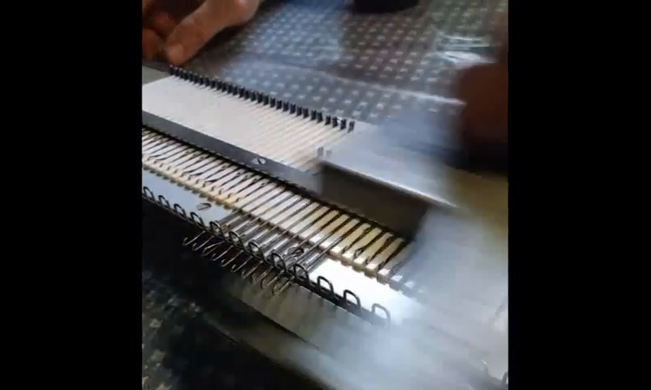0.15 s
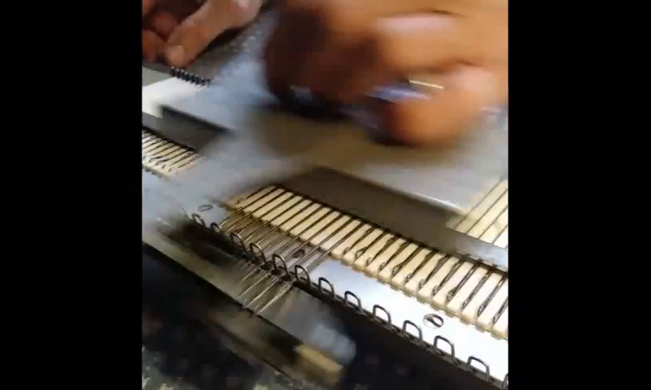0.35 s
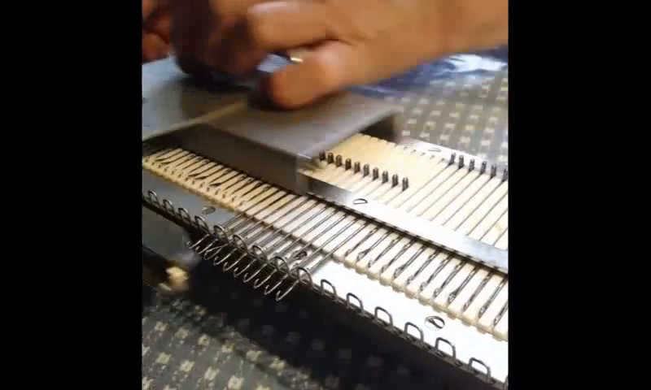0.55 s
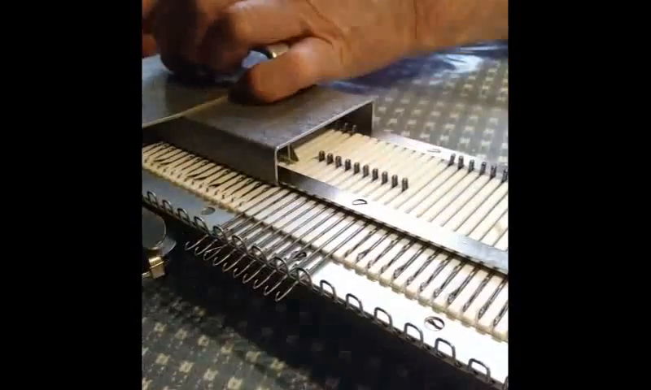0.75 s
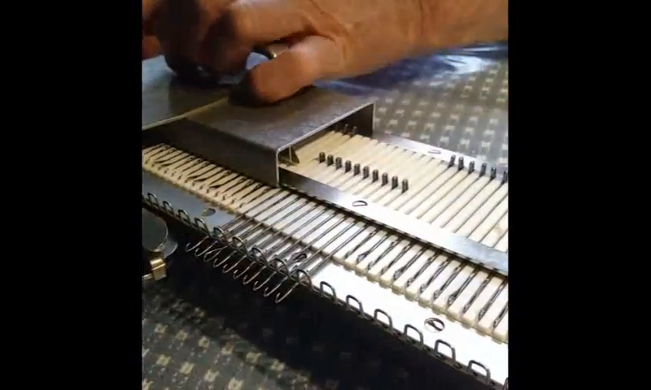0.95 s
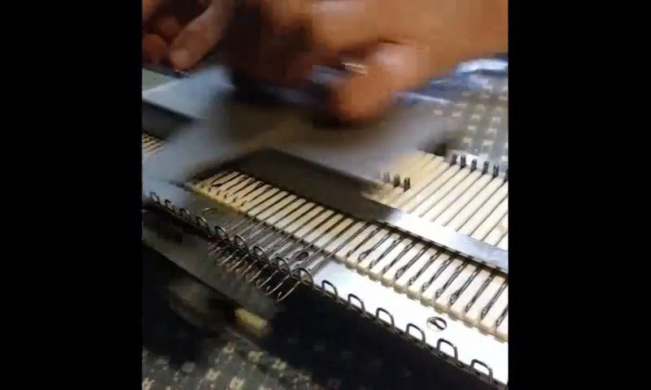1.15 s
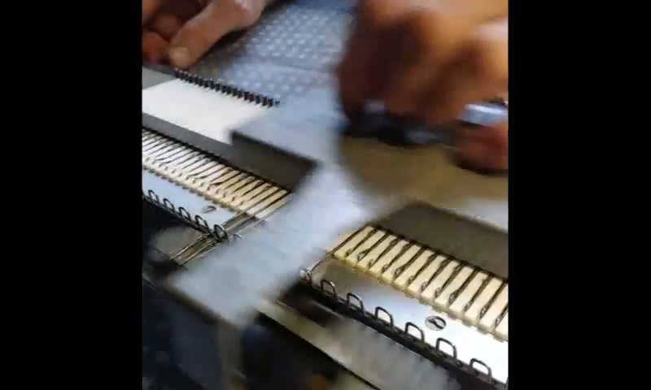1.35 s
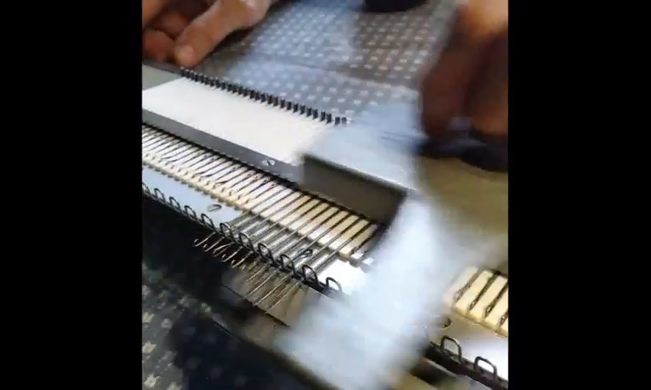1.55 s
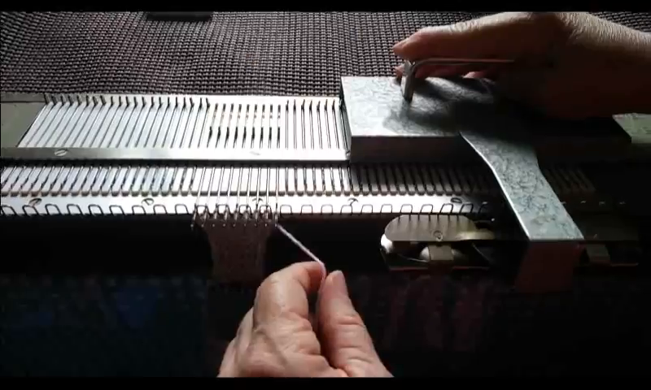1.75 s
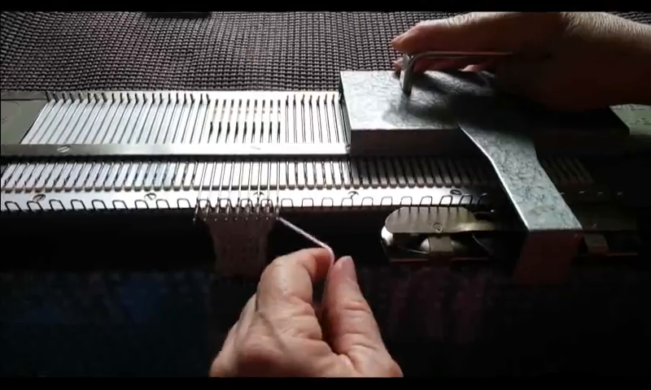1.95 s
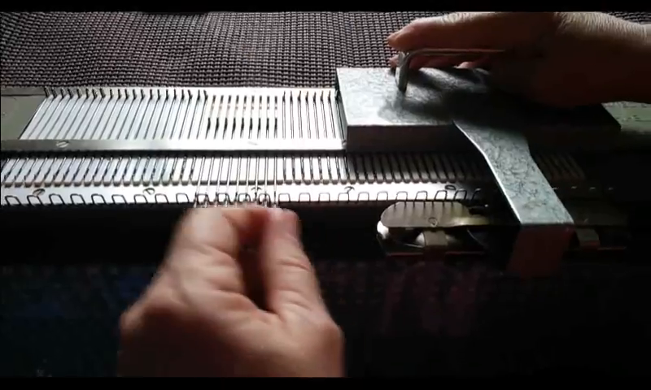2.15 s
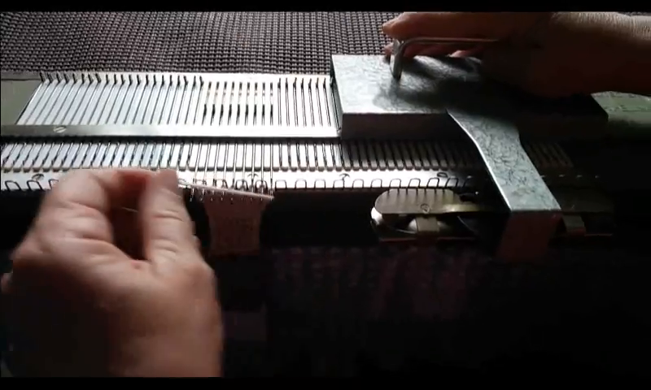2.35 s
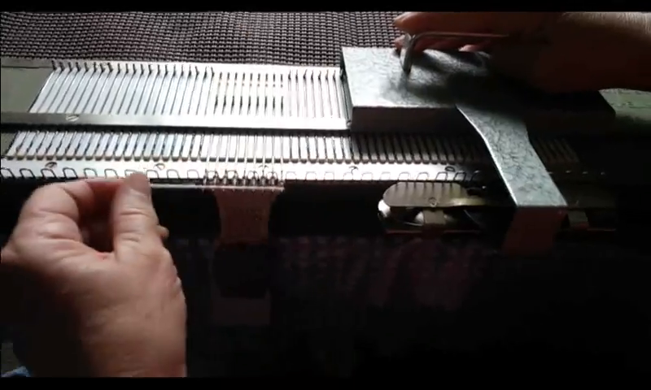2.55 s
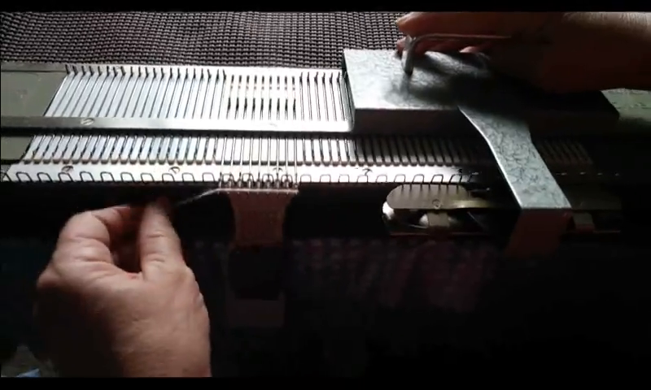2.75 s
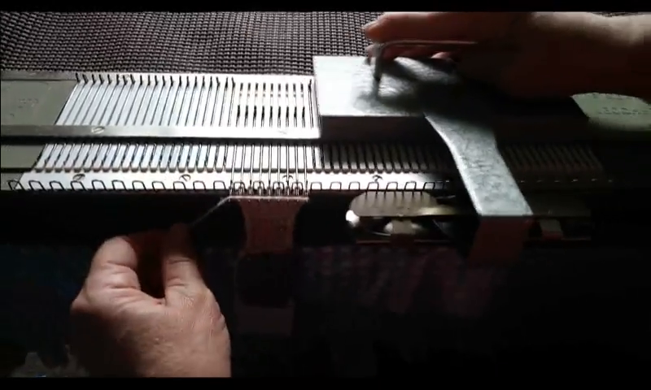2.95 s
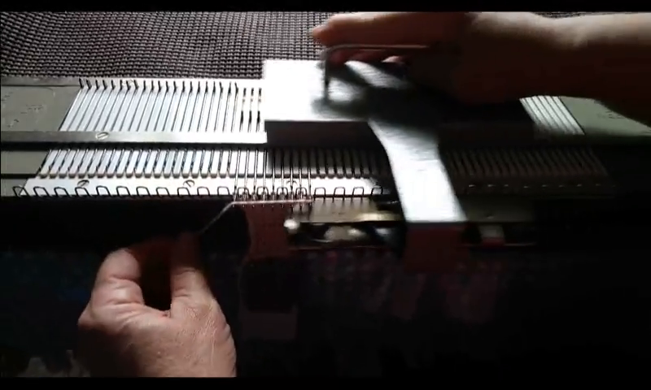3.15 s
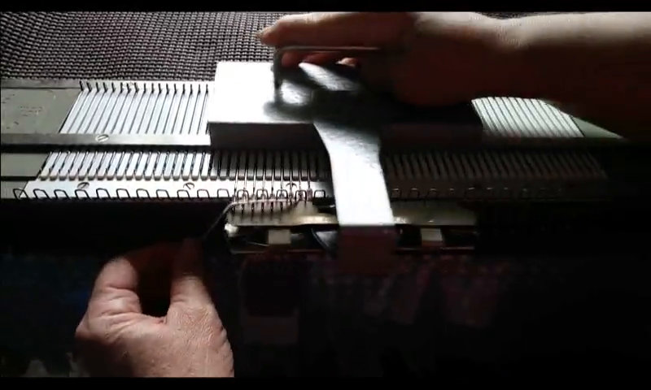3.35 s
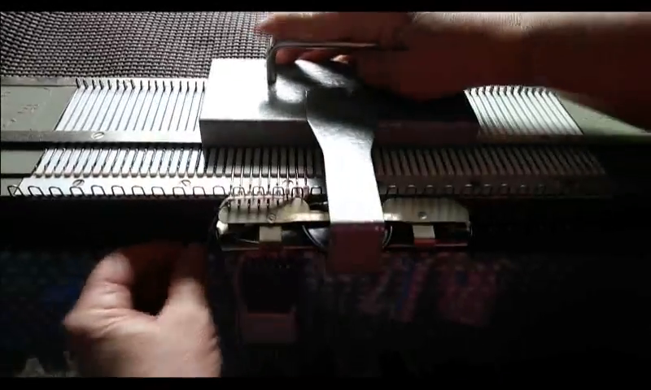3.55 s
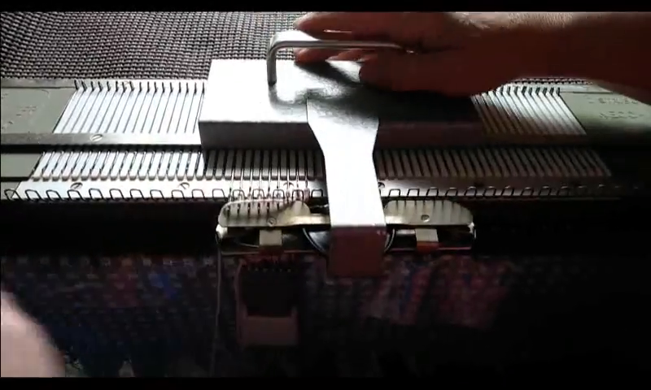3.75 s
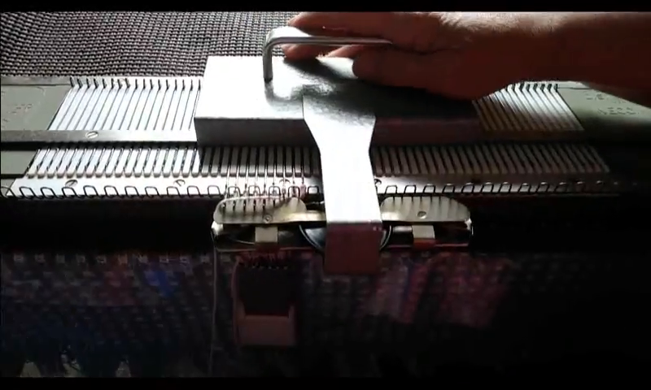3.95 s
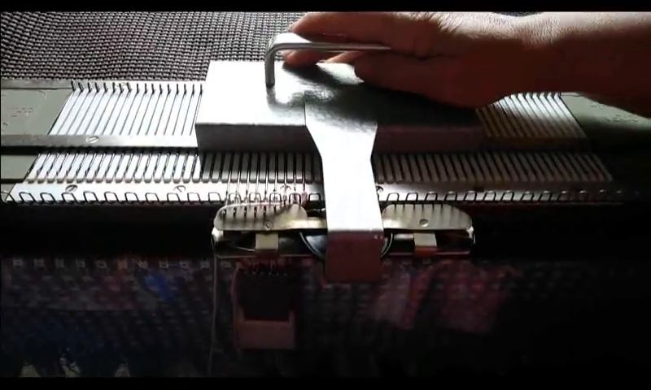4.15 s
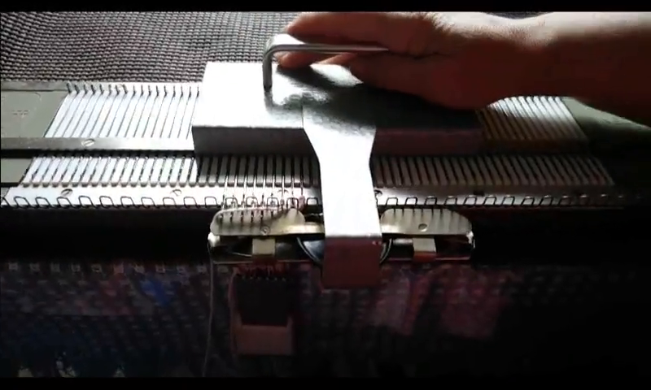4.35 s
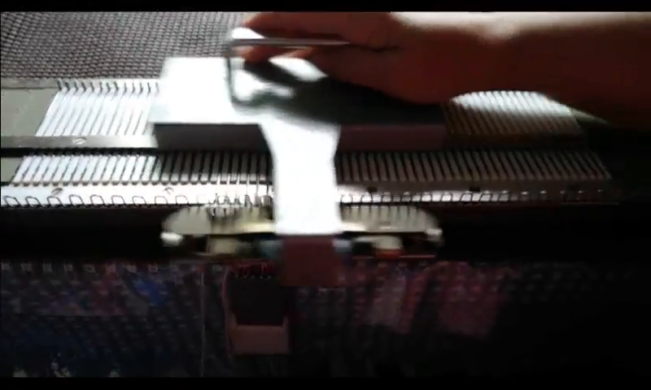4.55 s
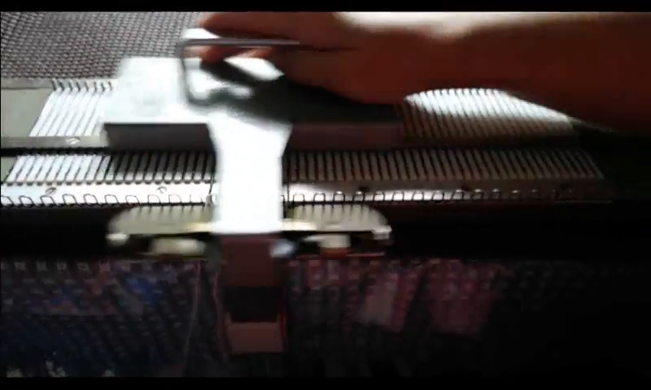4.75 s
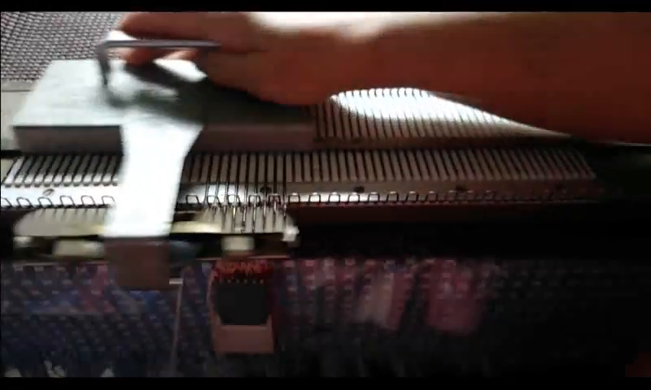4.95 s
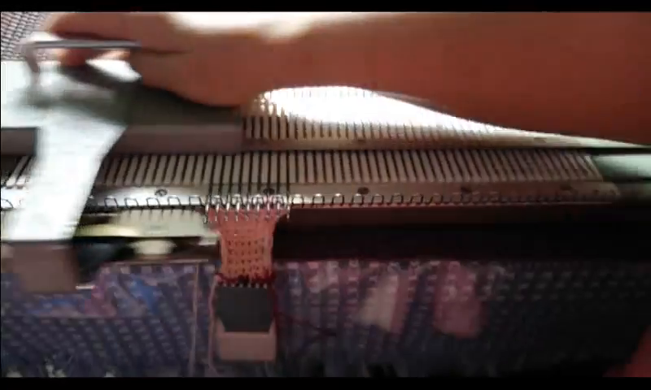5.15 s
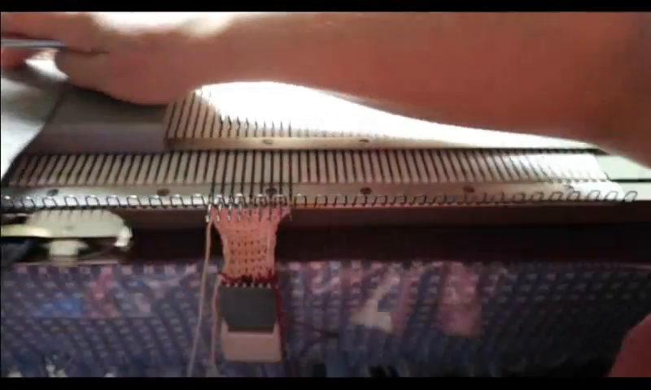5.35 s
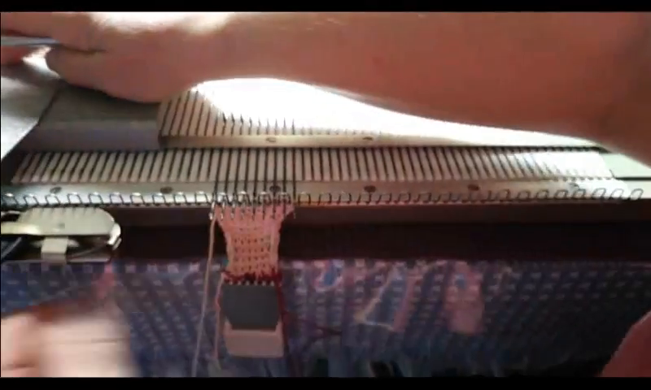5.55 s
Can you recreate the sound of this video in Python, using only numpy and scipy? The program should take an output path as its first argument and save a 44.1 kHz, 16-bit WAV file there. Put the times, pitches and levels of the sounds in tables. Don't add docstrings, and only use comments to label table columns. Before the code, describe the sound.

Dense metal-on-metal rubbing and rapid needle ticks burst out near the microphone, stop, and resume as a stuttering return stroke. A brief cut to silence follows. Then the machine is heard from further away in a quiet room: near-silence, a gentle ticking slide, a few muffled thumps on the table, and a jerky start into a brighter, clattering stroke that trails away. Faint hiss and wavering narrow bands leak through the suppressed background.

```python
import sys
import numpy as np
from scipy import signal
from scipy.fft import rfft, irfft, next_fast_len
from scipy.io import wavfile
from scipy.ndimage import uniform_filter1d

SR = 44100
rng = np.random.default_rng(int(sys.argv[2]) if len(sys.argv) > 2 else 0)


def output_pcm(signal):
    pcm = np.clip(np.atleast_2d(signal).T, -1, 1) * 32767
    wavfile.write(sys.argv[1], SR, np.round(pcm).astype(np.int16))


def gain_from_db(level_db):
    decades = np.asarray(level_db, float) / 20
    return 10 ** decades


N = 246959
SIZE = next_fast_len(N + SR // 4)
HZ = np.fft.rfftfreq(SIZE, 1 / SR) + 1e-3

SILENCE_S = (1.782, 1.828)

# time in seconds, level in dB.
EFFORT_CLOSE = [
    [(0.0, -25), (0.018, -36.5), (0.056, -33.5), (0.07, -21), (0.13, -15), (0.316, -14.5), (0.592, -47),
     (0.7, -99)],
    [(0.89, -118), (0.932, -38.5), (1.066, -27.5), (1.072, -18), (1.112, -23.5), (1.17, -13.5),
     (1.216, -19), (1.224, -16), (1.43, -31.5)],
    [(1.43, -30), (1.51, -16), (1.552, -27.5), (1.562, -31.5), (1.596, -30.5), (1.618, -40), (1.636, -24.5),
     (1.732, -33), (1.78, -43)],
]
EFFORT_FAR = [
    [(2.74, -71.5), (2.854, -42), (3.04, -43.5), (3.058, -35), (3.148, -35), (3.278, -30), (3.462, -57.5),
     (3.526, -58.5), (3.64, -73)],
    [(4.38, -62), (4.418, -48.5), (4.434, -36), (4.5, -25), (4.548, -27.5), (4.562, -43), (4.574, -33.5),
     (4.622, -41), (4.68, -33)],
    [(4.68, -29.5), (4.704, -33.5), (4.728, -21.5), (4.738, -20), (4.772, -28), (4.776, -23), (5.306, -35),
     (5.388, -50), (5.6, -72)],
]
# pace in needles per second, then rumble, body and top in dB at an effort of -30 dB.
SHOVES_CLOSE = [(90, -48, -42, -44.5), (78, -45, -39.5, -52), (69.25, -46.5, -43.5, -45)]
SHOVES_FAR = [(47.8, -72, -38, -51), (58.7, -49.5, -35.5, -41.5), (46.3, -55, -35.5, -40)]
FOLLOW_CLOSE = (0.35, 0.79)
FOLLOW_FAR = (0.58, 1)
TOP_FOLLOWS = 1.15
REST_DB, REST_RUMBLE_DB, TABLE_LAG_S = -92, -77, .08

# start in seconds, peak in dB, top in dB above that.
NEEDLES_CLOSE = [(0.0717, -7, -21), (0.1096, -3, -22), (0.1474, -1, -24), (0.1714, -1, -25),
                 (0.1945, -1, -25), (0.2134, -4, -22), (0.2249, -3, -22), (0.2349, -2, -22),
                 (0.2464, -2, -20), (0.2664, -2, -25), (0.2894, -2, -23), (0.3154, -2, -25),
                 (0.387, -9, -31), (0.4004, -9, -31), (0.4144, -12, -28), (0.9343, -25, -35),
                 (1.071, -10, -27), (1.0974, -11, -25), (1.1618, -5, -25), (1.1804, -3, -27),
                 (1.2251, -3, -26), (1.2504, -3, -26), (1.3189, -9, -27), (1.3693, -8, -31),
                 (1.3992, -10, -29), (1.479, -8, -22), (1.5094, -7, -24), (1.5888, -14, -31),
                 (1.6347, -14, -30), (1.724, -17, -39)]
NEEDLES_FAR = [(2.8245, -31, -24), (2.9374, -30, -26), (3.0484, -25, -29), (3.1253, -22, -23),
               (3.2071, -19, -21), (3.2385, -16, -23), (3.27, -19, -16), (3.3049, -19, -23),
               (4.4358, -18, -12), (4.4623, -15, -15), (4.4872, -12, -14), (4.5007, -13, -15),
               (4.5244, -16, -11), (4.5605, -13, -37), (4.6399, -23, -31), (4.6818, -22, -13),
               (4.7122, -13, -15), (4.7257, -4, -20), (4.7494, -9, -23), (4.7636, -1, -26),
               (4.787, -7, -23), (4.8084, -14, -16), (4.8329, -7, -22), (4.8544, -12, -19),
               (4.8773, -11, -20), (4.9038, -10, -25), (4.9364, -19, -16), (4.9634, -18, -18),
               (5.023, -13, -27), (5.0459, -12, -28)]
PAUSE_S, SPACING_JITTER = .125, .12
KNOCK_T60_S, KNOCK_RISE_S = .024, .002

# frequency in Hz, level in dB per Hz.
CLOSE_TONE = [(25, -40.5), (80, -17.5), (300, -17.5), (600, -20), (1300, -13), (2100, -18.5), (4000, -15),
              (5200, -5), (7000, -16.5), (8500, -23.5), (12000, -21), (13500, -18.5), (14700, -18),
              (15800, -19)]
FAR_TONE = [(25, -44.5), (70, -11.5), (170, -26), (280, -46.5), (620, -11.5), (900, 0.5), (2000, 3.5),
            (5000, 4), (7000, -2.5), (9500, -7), (11600, -15), (14100, -9.5), (15000, -13), (15800, -18.5)]
# frequency in Hz, width in Hz, level in dB.
CLOSE_RINGS = [(1000, 250, -12), (1400, 230, -9), (1800, 110, -10), (3140, 230, -8), (4750, 200, -3),
               (5300, 450, 1), (6820, 260, -8), (7870, 170, -6), (9300, 500, -18)]
FAR_RINGS = [(986, 60, 5), (1610, 36, 3), (1970, 420, 7), (2964, 27, 12), (3610, 180, 8.5), (4370, 39, -4),
             (5070, 1260, 3), (6660, 410, -15)]
ZONE_EDGES_HZ = (0, 450, 2500, 9000, 22050)
CUTOFF_HZ = 15850
DULLING = .13

# frequency in Hz, level in dB per Hz.
HISS_TONE = [(30, -17.5), (200, -5), (450, -15), (3000, -15), (6000, -14.5), (10000, -22.5), (14500, -17),
             (16000, -39)]
HISS_DB = -76.5

# start in seconds, end in seconds, frequency in Hz, level in dB.
LEAKS = [(0.48, 0.85, 490, -57), (.48, 0.82, 1750, -58), (.45, 0.74, 5280, -66), (0.786, 0.86, 2520, -64.5),
         (2.09, 2.56, 2230, -60.5), (2.45, 2.85, 2270, -69), (2.272, 2.42, 5860, -78),
         (2.37, 2.52, 1340, -77), (2.39, 2.674, 142, -65.5), (2.66, 2.844, 3700, -75),
         (3.364, 3.468, 475, -57), (3.34, 3.58, 5700, -67), (3.45, 3.638, 3680, -68),
         (3.478, 3.648, 2220, -68), (3.74, 3.927, 3690, -76), (4.046, 4.155, 1150, -58),
         (4.045, 4.166, 1760, -63), (4.19, 4.45, 2170, -65), (4.288, 4.453, 3080, -63),
         (4.248, 4.454, 4470, -57.5), (4.266, 4.45, 6820, -66), (4.304, 4.437, 5950, -72),
         (4.29, 4.44, 5020, -64), (2.84, 2.924, 570, -65), (2.92, 2.982, 450, -54.5),
         (5.276, 5.592, 393, -74.5), (2.1, 2.4, 4190, -81)]
# start in seconds, end in seconds, frequency in Hz, level in dB.
CREEP_LEAKS = [(2.788, 3.046, 3480, -52), (2.77, 3.08, 14400, -69), (5.343, 5.656, 2220, -62.5),
               (5.34, 5.65, 4320, -62.5), (5.35, 5.65, 5260, -58), (5.38, 5.642, 5800, -62)]
NARROW, WIDE = 2.43, 5.6

# start in seconds, peak in dB, t60 in seconds, lowest Hz, brightness in Hz.
KNOCKS = [(0.82, -35, 0.067, 59.6, 890), (3.511, -34, 0.26, 1100, 2500), (3.673, -23, 0.3, 109, 2600),
          (3.673, -36, 0.24, 2460, 5300), (4.075, -42, 0.3, 800, 2300), (4.391, -33, 0.023, 1180, 2390),
          (3.512, -28, .02, 1100, 3200), (1.835, -55, .08, 4500, 6200), (0.813, -29, .2, 30.3, 130),
          (2.838, -39, 0.12, 151, 300), (4.441, -21, .3, 25, 90), (4.68, -21, 0.33, 30, 110),
          (3.675, -33, .6, 30, 400), (2.85, -34, .7, 30, 130), (3.27, -36, .7, 30, 110)]
# frequency in Hz, level in dB, t60 in seconds.
TABLE_MODES = [(166.6, 14, 0.7), (553, -6, 0.34), (910, 17, 0.087), (1516, 3.5, 1.5), (3630, -8, 0.26)]


def rms_one(x):
    return x / np.sqrt(np.mean(x ** 2) + 1e-20)


def at_hz(points):
    hz, db = np.transpose(points)
    return gain_from_db(np.interp(np.log(HZ), np.log(hz), db))


def causal(gain):
    cepstrum = irfft(np.log(gain + 1e-7), SIZE)
    cepstrum[1:SIZE // 2] *= 2
    cepstrum[SIZE // 2 + 1:] = 0
    return np.exp(rfft(cepstrum))


def filtered(x, response):
    return irfft(rfft(x, SIZE) * response, SIZE)[:N]


def drift(rate_hz):
    r = np.exp(-2 * np.pi * rate_hz / SR)
    wander = signal.lfilter([1], [1, -2 * r, r * r], rng.standard_normal(N + SR))
    return rms_one(wander[SR:])


def stroke_levels(shoves, rules, follow):
    t = np.arange(N) / SR
    effort = np.full(N, float(REST_DB))
    for s, db in map(np.transpose, shoves):
        pushing = (t >= s[0]) & (t <= s[-1])
        effort = np.where(pushing, np.interp(t, s, db), effort)
    starts = [shove[0][0] for shove in shoves]
    which = np.clip(np.searchsorted(starts, t) - 1, 0, None)
    pace, rumble, body, top = np.transpose(rules)[:, which]
    slow = uniform_filter1d(effort, size=int(TABLE_LAG_S * SR))
    rumble = np.maximum(rumble + follow[0] * (slow + 30), REST_RUMBLE_DB)
    body = body + follow[1] * (effort + 30)
    top = top + TOP_FOLLOWS * (effort + 30)
    return [rumble, body, effort, top], pace


def scrape(grains_per_s, spread_db, smooth_db):
    sizes = gain_from_db(spread_db * np.minimum(rng.exponential(1, N), 5)) * rng.choice([-1, 1], N)
    grains = rms_one(sizes * (rng.random(N) < grains_per_s / SR))
    return rms_one(grains + gain_from_db(smooth_db) * rng.standard_normal(N))


def all_needles(clear, effort, pace, passing_db, uneven_db):
    rows = list(clear)
    draws = rng.standard_normal((len(clear), 12, 2))
    for (s, _, top_db), (next_s, _, _), draw in zip(clear, clear[1:], draws):
        gap_s = next_s - s
        steps = int(round(gap_s * pace[int(s * SR)])) if gap_s < PAUSE_S else 0
        for k in range(1, steps):
            at_s = s + gap_s * (k + SPACING_JITTER * draw[k, 0]) / steps
            level_db = effort[int(at_s * SR)] + passing_db + uneven_db * draw[k, 1]
            rows.append((at_s, level_db, top_db))
    return np.transpose(rows)


def needle_shape(at_s, level_db, rise_s, t60):
    t = np.arange(-SR // 100, SR // 10) / SR
    bump = np.where(t < 0, np.exp(-(t / rise_s) ** 2), gain_from_db(-60 * t / t60))
    strikes = np.zeros(N + SR)
    strikes[(at_s * SR).astype(int)] = gain_from_db(level_db)
    return signal.oaconvolve(strikes, bump)[SR // 100:][:N]


def machine_bands(tone, rings, ring_db, count):
    power = at_hz(tone) ** 2
    for hz, width, db in rings:
        power = power + gain_from_db(db + ring_db) ** 2 / (1 + (2 * (HZ - hz) / width) ** 2) ** 2
    parts = []
    for zone, (low, high) in enumerate(zip(ZONE_EDGES_HZ, ZONE_EDGES_HZ[1:])):
        edges = np.geomspace(max(low, 20), min(high, CUTOFF_HZ + 500), count + 1)
        shares = [1 / (1 + (a / HZ) ** 16) / (1 + (HZ / b) ** 16) for a, b in zip(edges, edges[1:])]
        whole = np.mean(power * sum(shares))
        parts += [(zone, causal(np.sqrt(power * share / whole))) for share in shares]
    return parts


def carriage(shoves, rules, follow, needles, tone, rings, ring_db, knock_db, passing_db, body_db, top_db,
             tick_db, patchy_db, colour_db, slack_db):
    levels, pace = stroke_levels(shoves, rules, follow)
    effort = levels[2]
    onset_s, level_db, bright_db = all_needles(needles, effort, pace, passing_db, uneven_db=1.5)
    at_s = onset_s + .0012
    parts = machine_bands(tone, rings, ring_db, count=4)
    favour = colour_db * rng.standard_normal((200, len(parts)))[:len(at_s)]
    zone_db = [-40, body_db, 0, bright_db + top_db]
    zone_t60 = KNOCK_T60_S * np.array([1, 1.5, 1, .6])
    rub = scrape(grains_per_s=4000, spread_db=6.0, smooth_db=6.0) * gain_from_db(0.26 * drift(120))
    dull_db = DULLING * np.minimum(uniform_filter1d(effort, size=SR // 25) - slack_db, 0)
    out = np.zeros(N)
    for k, (zone, response) in enumerate(parts):
        slide = gain_from_db(levels[zone] + 1.0 + patchy_db * drift(6.3) + max(k - 9, 0) * dull_db)
        strength_db = level_db + knock_db + zone_db[zone] + favour[:, k]
        rattle = needle_shape(at_s, strength_db, KNOCK_RISE_S, zone_t60[zone])
        tick = np.zeros(N)
        tick[(at_s * SR).astype(int)] = gain_from_db(strength_db + tick_db)
        out += filtered(rub * (slide + rattle) + tick, response)
    return out


def faint_hiss():
    t = np.arange(N) / SR
    hiss = gain_from_db(HISS_DB) * rms_one(filtered(rng.standard_normal(N), at_hz(HISS_TONE)))
    settling = np.clip(0.35 + (t - SILENCE_S[1]) / .5, 0, 1)
    return hiss * np.where(t > SILENCE_S[0], settling, 1)


def leaks(wobble_db, edge_s):
    out, t = np.zeros(N), np.arange(N) / SR
    white, waver = rng.standard_normal(N), gain_from_db(wobble_db * drift(40))
    rows = [(row, NARROW) for row in LEAKS] + [(row, WIDE) for row in CREEP_LEAKS]
    for (start, end, hz, db), spread in rows:
        part = slice(int(start * SR), int(end * SR))
        width = spread * np.sqrt(hz)
        sos = signal.butter(3, [hz - 0.58 * width, hz + 0.45 * width], "band", fs=SR, output="sos")
        opening = (t[part] - start) / (edge_s + 0.054 * (end - start))
        closing = (end - t[part]) / (edge_s + 0.102 * (end - start))
        swell = np.clip(np.minimum(opening, closing), 0, 1) ** 2
        out[part] += gain_from_db(db) * swell * rms_one(signal.sosfilt(sos, white[part])) * waver[part]
    return out


def table_knocks():
    out, t = np.zeros(N + SR), np.arange(SR // 2) / SR
    draws = rng.standard_normal((len(KNOCKS), len(t)))
    chatter = 1 + 1.04 * np.exp(-(t * 170 % 1) * 4)
    for (s, db, t60, low_hz, bright_hz), noise in zip(KNOCKS, draws):
        blow = gain_from_db(-3.5) * noise * chatter * gain_from_db(-60 * t / t60)
        for hz, mode_db, mode_t60 in TABLE_MODES:
            ring = gain_from_db(mode_db - 27.5 - 60 * t / min(mode_t60, t60))
            blow = blow + ring * np.sin(2 * np.pi * hz * t)
        dull = signal.butter(5, [low_hz, bright_hz], "band", fs=SR, output="sos")
        out[int(s * SR):][:len(t)] += gain_from_db(db) * signal.sosfilt(dull, blow)
    return out[:N]


def suppress(x, shut_db, depth_db, weak_db, ragged_db):
    _, _, spectrum = signal.stft(x, nperseg=512, noverlap=384)
    power = uniform_filter1d(np.abs(spectrum) ** 2, size=9, axis=-1)
    power = uniform_filter1d(power, size=3, axis=-2)
    open_share = power / (power + gain_from_db(shut_db) ** 2)
    gain = gain_from_db(depth_db) + (1 - gain_from_db(depth_db)) * open_share
    stripes = uniform_filter1d(rng.standard_normal(power.shape), size=90, axis=-1)
    stripes = uniform_filter1d(stripes, size=3, axis=-2)
    weak_share = gain_from_db(weak_db) ** 2 / (power + gain_from_db(weak_db) ** 2)
    gain = gain * gain_from_db(ragged_db * weak_share * (np.clip(rms_one(stripes), -3, 1.5) - 0.3338))
    return signal.istft(spectrum * gain, nperseg=512, noverlap=384)[1][..., :N]


def scene():
    close = carriage(EFFORT_CLOSE, SHOVES_CLOSE, FOLLOW_CLOSE, NEEDLES_CLOSE, CLOSE_TONE, CLOSE_RINGS,
                     ring_db=-8.5, knock_db=-8.5, passing_db=10.0, body_db=-21.0, top_db=3.0,
                     tick_db=12, patchy_db=2.5, colour_db=3.44, slack_db=-30)
    far = carriage(EFFORT_FAR, SHOVES_FAR, FOLLOW_FAR, NEEDLES_FAR, FAR_TONE, FAR_RINGS,
                   ring_db=-1.5, knock_db=-9.5, passing_db=0.5, body_db=-10.0, top_db=10,
                   tick_db=12, patchy_db=1.0, colour_db=4.5, slack_db=-38)
    machine = np.where(np.arange(N) < SILENCE_S[0] * SR, close, far)
    return (machine + table_knocks())[None]


def band_limit(x):
    return signal.sosfilt(signal.butter(12, 16810, fs=SR, output="sos"), x)


def record(dry):
    t = np.arange(N) / SR
    residue = faint_hiss() + leaks(wobble_db=3.2, edge_s=.04)
    cleaned = suppress(dry, shut_db=-86.0, depth_db=-15.5, weak_db=-71, ragged_db=9)
    fade_out, fade_in = (SILENCE_S[0] - t) / 0.0087, (t - SILENCE_S[1]) / .004
    mix = (cleaned + residue) * np.clip(np.maximum(fade_out, fade_in), 0, 1)
    mix = .88 * np.tanh(mix / .88)
    top_edge = signal.ellip(10, .3, 45, CUTOFF_HZ, fs=SR, output="sos")
    mix = signal.sosfilt(top_edge, mix)
    return band_limit(mix)


dry = scene()
out = record(dry)
output_pcm(out)
```